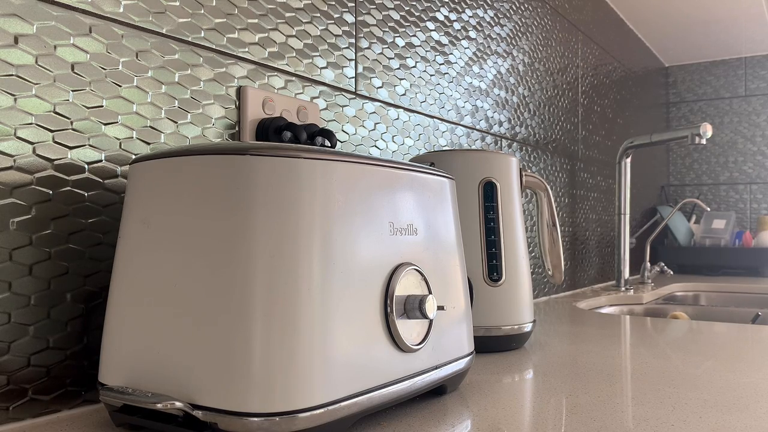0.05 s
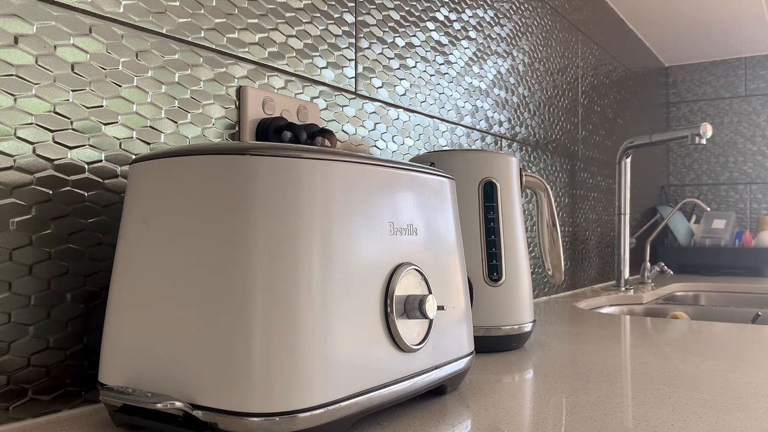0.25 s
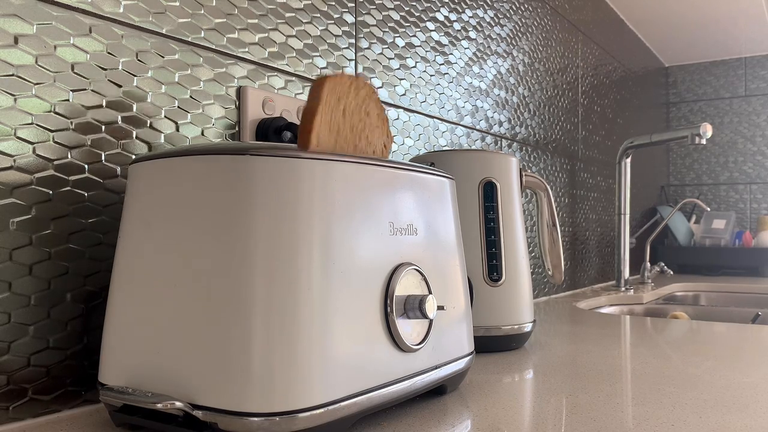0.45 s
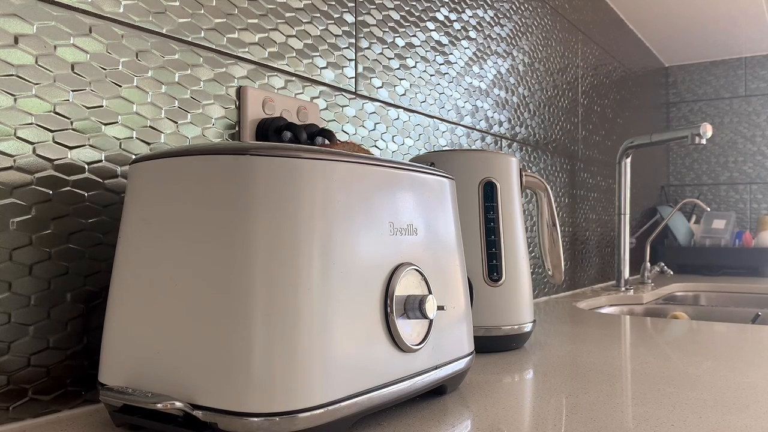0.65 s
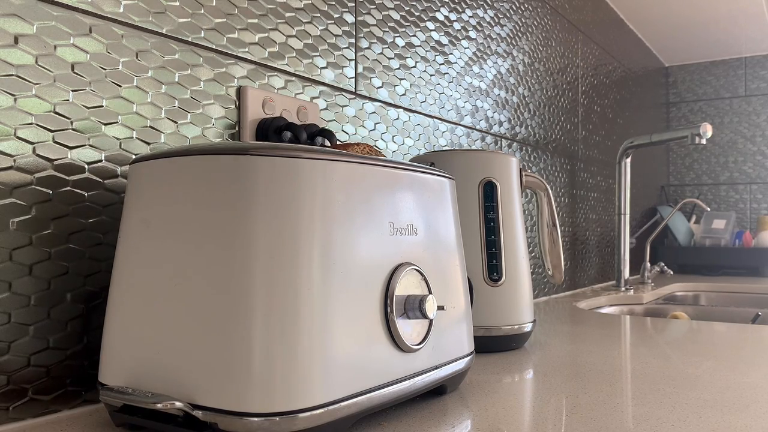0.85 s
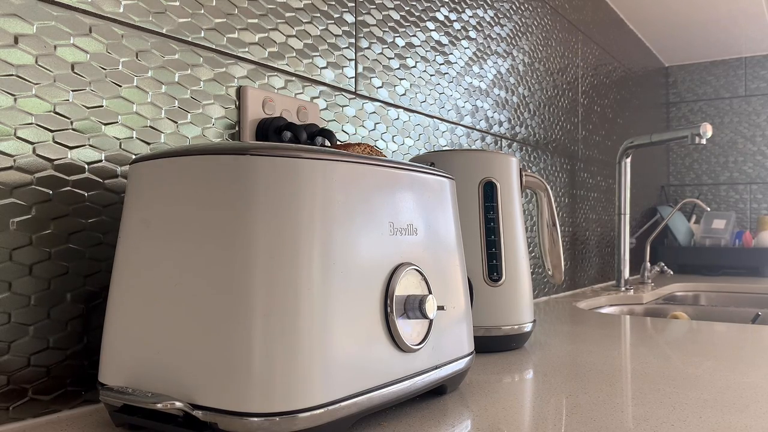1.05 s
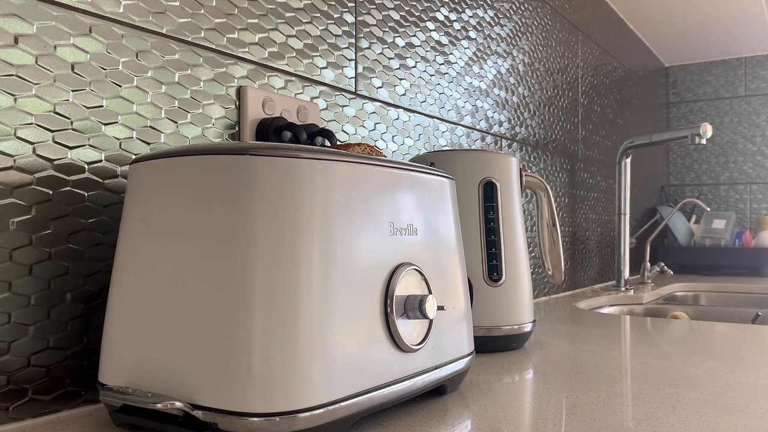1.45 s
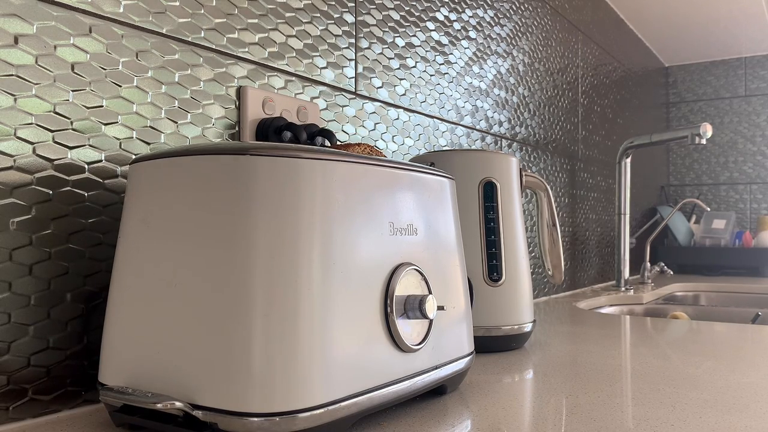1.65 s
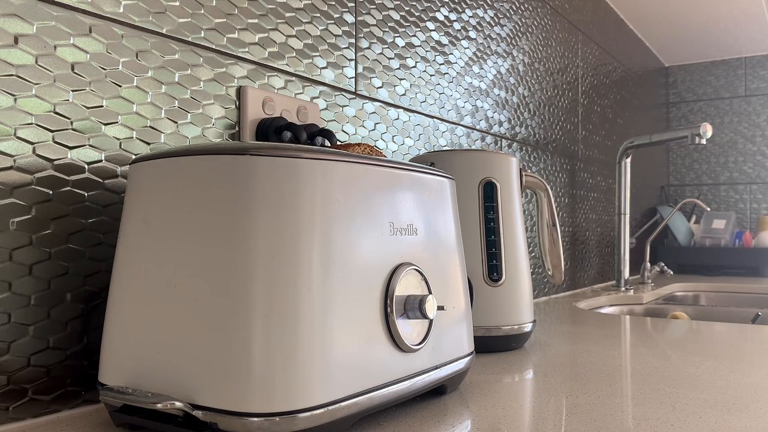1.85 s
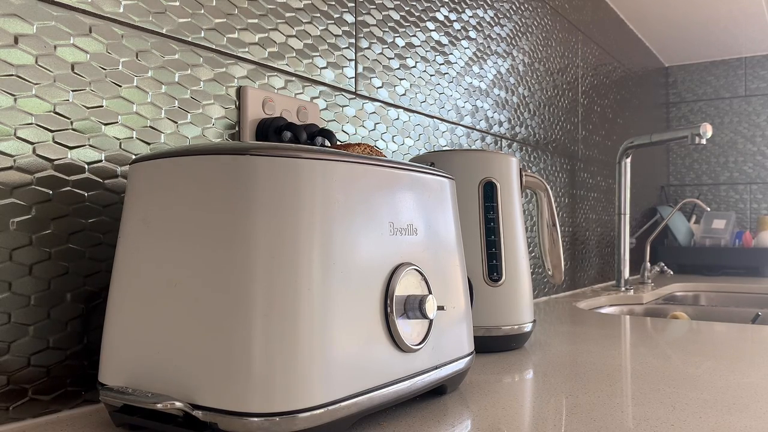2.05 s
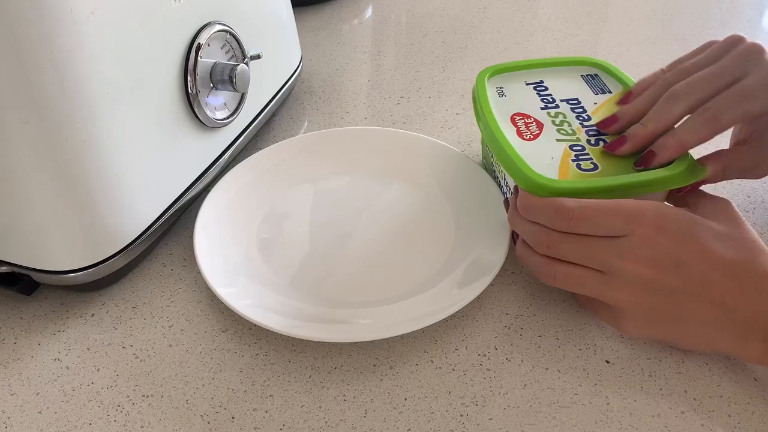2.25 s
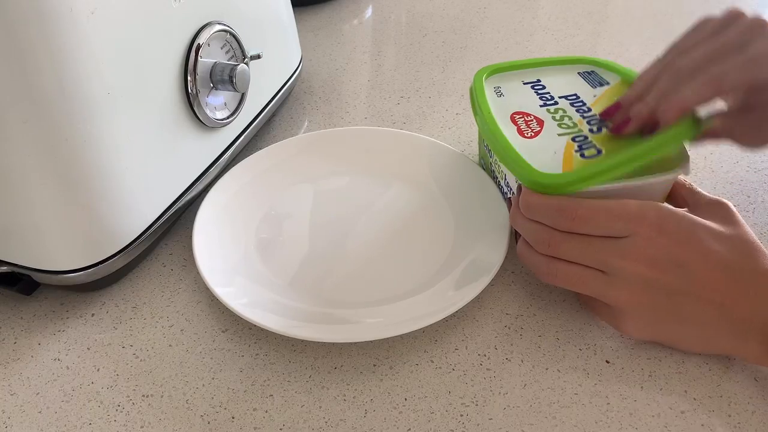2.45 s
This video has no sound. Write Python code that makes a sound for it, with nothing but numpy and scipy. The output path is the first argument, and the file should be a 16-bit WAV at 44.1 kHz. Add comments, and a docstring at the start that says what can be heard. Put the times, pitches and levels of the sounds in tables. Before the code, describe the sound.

A toaster pops up with a sharp metallic clack and rattle in a quiet kitchen.

```python
"""A quiet tiled kitchen, a phone's microphones close to a toaster on a stone counter.
The latch clicks and the magnet's faint whine stops. The sprung carriage scrapes up its guides and clacks
against its stop, the wire cage rattles, and the bread drops back and knocks as it settles.
A low hum swells and fades, and the hot metal ticks once as it cools. Near the end comes a soft click
and low bump as the room tone suddenly drops; then a plastic tub is handled on the counter."""
import sys
import numpy as np
from scipy import signal
from scipy.fft import rfft, irfft
from scipy.io import wavfile

SR = 44100
rng = np.random.default_rng(int(sys.argv[2]) if len(sys.argv) > 2 else 0)


def inscribe(sig):
    """Save sig as 16-bit PCM at rate SR to the path in sys.argv[1].

    A 1-D sig is mono; a 2-D sig holds one channel per row.
    Samples are clipped to [-1, 1] before scaling.
    """
    pcm = np.round(np.clip(np.atleast_2d(sig).T, -1, 1) * 32767)
    wavfile.write(sys.argv[1], SR, pcm.astype(np.int16))


N = 110250
T = np.arange(N) / SR
HZ = np.maximum(np.fft.rfftfreq(2 * N, 1 / SR), 1)


def amp(db):
    return 10 ** (np.asarray(db) / 20)


def curve(at, rows, column=1):
    """Straight lines through a column of a table."""
    rows = np.array(rows, float)
    return np.interp(at, rows[:, 0], rows[:, column])


def by_pitch(hz, rows):
    """Straight lines on a log-frequency axis."""
    rows = np.array(rows, float)
    return np.interp(np.log(hz), np.log(rows[:, 0]), rows[:, 1])


def unit(x):
    """Scale to the energy of one millisecond at full level."""
    return x / np.sqrt(np.sum(x ** 2, axis=-1, keepdims=True) * 1000 / SR)


def tint(x, db):
    """Minimum-phase filter with the given gain at each frequency."""
    cepstrum = irfft(np.log(amp(db)))
    cepstrum[1:N] *= 2
    cepstrum[N + 1:] = 0
    return irfft(rfft(x, 2 * N) * np.exp(rfft(cepstrum)))[..., :N]


def through(x, response):
    """Pass a sound through a response scaled to unit energy."""
    response = response / np.sqrt(np.mean(np.sum(response ** 2, axis=-1)))
    return signal.fftconvolve(np.atleast_2d(x), np.atleast_2d(response), axes=-1)[:, :N]


def fade(t60):
    """Fall by 60 dB in t60 seconds."""
    return np.exp(-np.log(1000) * np.minimum(T / max(t60, 1 / SR), 10))


def delay(x, start):
    """Start a sound at the given second."""
    gap = int(np.clip(start * SR, 0, N - 1))
    return np.concatenate([np.zeros(x.shape[:-1] + (gap,)), x[..., :N - gap]], axis=-1)


def ring(modes, scatter):
    """Decaying modes; scatter sets how far their phases differ at the two microphones."""
    phases = scatter * np.pi * rng.uniform(-1.2, 1, (len(modes), 2, 1))
    return unit(sum(amp(db) * fade(t60) * np.sin(2 * np.pi * hz * T + phase)
                    for (hz, db, t60), phase in zip(modes, phases)))


def crack(colour, t60):
    """Countless short modes: a coloured burst, different at each microphone."""
    burst = rng.standard_normal((2, N)) * fade(t60)
    return unit(tint(burst, by_pitch(HZ, colour)))


# The empty kitchen's tone. Each row: frequency in Hz, relative density in dB.
AIR_COLOUR = [(45, -24.5), (70, -10), (85, -11.5), (110, -14.5), (174, -23.5), (250, -25.5), (360, -28.5),
              (517, -28.5), (1070, -28.5), (1400, -34), (1800, -44.5), (2500, -46.5), (3200, -62),
              (4200, -75), (16000, -85)]
# Its loudness. Each row: time in seconds, level in dB.
AIR_LEVELS = [(0, -55.5), (.2, -54.5), (1.2, -52), (2.235, -51.5), (2.26, -60.5), (2.5, -60)]
# The microphones' own hiss. Each row: frequency in Hz, relative density in dB.
HISS_COLOUR = [(2500, -3.5), (4200, -2), (7000, -6), (10500, -1), (16000, -15)]
# The low hum. Each row: time in seconds, level in dB, pitch in Hz.
HUM_PATH = [(0, -46.5, 49.8), (.08, -46.5, 50.48), (.2, -56.5, 49.77), (.4, -53.5, 51.85),
            (.58, -43, 52.16), (.7, -48.5, 51.96), (.86, -57, 52.2), (1.04, -49.5, 52.6),
            (1.22, -58.5, 52.85), (1.4, -47.5, 53.34), (1.51, -42.5, 53.33), (1.66, -42.5, 53.33),
            (1.75, -50, 53.47), (1.84, -40, 51.3), (1.96, -39, 52.86), (2.15, -47.5, 50.34),
            (2.36, -55, 51.77), (2.5, -55, 51.2)]


def background():
    """Dull room tone, faint microphone hiss and a low hum that swells and fades."""
    low_cut_db = 10 * np.log10(1 + (45 / HZ) ** 4)
    air = tint(rng.standard_normal((2, N)), by_pitch(HZ, AIR_COLOUR) - low_cut_db)
    hiss = tint(rng.standard_normal((2, N)), by_pitch(HZ, HISS_COLOUR))
    hum_phase = 2 * np.pi * np.cumsum(curve(T, HUM_PATH, column=2)) / SR
    hum = np.sqrt(2) * amp(curve(T, HUM_PATH)) * np.sin(hum_phase)
    return air / air.std() * amp(curve(T, AIR_LEVELS)) + hiss / hiss.std() * amp(-83) + hum


# The magnet's whine. Each row: harmonic number, level in dB.
WHINE_HARMONICS = [(2, -82), (5, -96), (6, -98), (7, -90), (8, -89), (11, -91), (12, -90), (13, -99),
                   (17, -98)]


def magnet(pitch_hz=905):
    """The holding magnet whines faintly until the latch lets go."""
    whine = sum(amp(db) * np.sin(2 * np.pi * k * pitch_hz * T) for k, db in WHINE_HARMONICS)
    return np.sqrt(2) * whine * (T < LATCH_CLICKS[0][0])


# The latch letting go. Each row: start in seconds, level in dB.
LATCH_CLICKS = [(0.173, -27), (0.1772, -30)]
# Its modes. Each row: frequency in Hz, relative level in dB, t60 in seconds.
LATCH_RING = [(861.5, -8.5, 0.14), (1300, -11.5, 0.032), (7040, -3.5, .03), (7040, -1.5, 0.023),
              (7600, -8, 0.023), (10120, -30.5, .025)]
# Sheet metal and wires, heard close. Each row: frequency in Hz, relative density in dB.
METAL_COLOUR = [(150, -21), (350, -3.5), (800, -2), (1400, 5), (2700, -3.5), (4200, 2), (8000, 0),
                (11000, 3), (16000, -0.5)]


def latch():
    """The catch snaps open with a thin metallic click."""
    click = ring(LATCH_RING, scatter=0.81) + amp(-5.5) * crack(METAL_COLOUR, t60=0.035)
    return sum(amp(db) * delay(click, start) for start, db in LATCH_CLICKS)


def contacts(per_second=4500, spread_db=3):
    """Dense tiny impacts of uneven size; each reaches the two microphones with its own strength."""
    strength = rng.choice([-1, 1], (2, N)) * amp(spread_db * rng.standard_normal((2, N)))
    impacts = (rng.random(N) < per_second / SR) * strength
    return impacts / impacts.std()


def chatter(start, db, tilt_db, rise, t60):
    """One blow breaks up into a dying shower of contacts, its spectrum tilted above 500 Hz."""
    shower = contacts() * np.minimum(T / max(rise, 1 / SR), 1) * fade(t60)
    tilted = tint(shower, tilt_db * np.log2(np.maximum(HZ, 500)))
    return amp(db) * delay(unit(tilted), start)


# The wire cage's modes. Each row: frequency in Hz, relative level in dB, t60 in seconds.
CAGE_RING = [(852.3, -10.5, 0.17), (1250, 2.5, .24), (1333, -3, 0.1974), (1360, -6.5, 0.1),
             (3598, -10.5, .2), (3897, -6.5, 0.2), (4436, 1, .25), (4986, -2, .2), (5281, -8.5, 0.21),
             (9910, -6.5, 0.2), (10187, -3, 0.2), (10640, 0.5, .24), (10790, -1.5, .18), (11700, 0, 0.2195),
             (12525, -2.5, .16), (15310, -2, .18)]


def cage(spread_db=1):
    """The wire cage rings in a slightly different mix of its modes at every blow."""
    offsets_db = spread_db * rng.standard_normal(len(CAGE_RING))
    modes = [(hz, db + offset, t60) for (hz, db, t60), offset in zip(CAGE_RING, offsets_db)]
    return amp(-16) * ring(modes, scatter=1.0)


# Blows on the carriage and its cage. Each row: start in seconds, level in dB,
# brightness in dB per octave, rise in seconds, t60 of the chatter in seconds.
CARRIAGE_BLOWS = [(0.1743, -30.5, -2, 0.0024, 0.2), (0.1996, -23, -6.5, 0.00089, 0.034),
                  (.2045, -21.5, -8.5, 0.0008, 0.1), (0.2066, -14, -2, 0.00028, 0.083),
                  (.2245, -24.5, -7.5, 0.0015, 0.037), (0.2746, -5, 1.7, 0.0028, 0.044),
                  (0.2832, -6.5, 1.7, 0.0034, 0.22), (.299, -15, -7.5, .002, 0.084),
                  (0.3076, -9, 4.5, 0.0017, 0.22), (.332, -19.5, -0.5, 0.0006, 0.028),
                  (0.4299, -25, -9, 0.0011, 0.078), (0.53, -20.5, 3, 0.0018, 0.072),
                  (.543, -22.5, -0.5, 0.0023, 0.18), (0.579, -29.5, -0.5, 0.0016, 0.37),
                  (.765, -50, -11.5, 0.0033, 0.1), (0.824, -40, -9, 0.0029, 0.16)]
# The carriage scraping up its guides. Each row: time in seconds, level in dB.
SCRAPE_LEVELS = [(.205, -62), (.236, -38), (.246, -30.5), (.262, -30), (.275, -18), (.285, -60)]


def carriage():
    """Scraping and blows ring the wire cage and, each at its own spot, the sheet metal."""
    sliding = (T > SCRAPE_LEVELS[0][0]) & (T < SCRAPE_LEVELS[-1][0])
    scrape = contacts() * amp(curve(T, SCRAPE_LEVELS)) * sliding
    forces = [scrape] + [chatter(*blow) for blow in CARRIAGE_BLOWS]
    return sum(through(force, crack(METAL_COLOUR, t60=0.044) + cage()) for force in forces)


def struck(modes, tilt_db):
    """The spot of a knock favours the high or the low modes."""
    return [(hz, db + tilt_db * np.log2(hz / modes[0][0]), t60) for hz, db, t60 in modes]


# Knocks on the case. Each row: start in seconds, level in dB, brightness in dB per octave.
CASE_KNOCKS = [(.184, -30, 11.5), (0.2023, -17, -11), (0.2231, -21, -4), (0.2318, -12.5, 3),
               (0.2825, -12.5, 8.5), (.2905, -17.5, 0), (.326, -23.5, -4), (.351, -22, -3), (.435, -31, 30),
               (.540, -23.5, 7), (0.576, -28.5, -3), (.612, -32, -8), (.642, -34, -2), (.682, -31.5, -10),
               (.698, -38.5, -4), (.823, -34.5, 2), (0.839, -36.5, -7), (.854, -43.5, -5)]
# The case's modes. Each row: frequency in Hz, relative level in dB, t60 in seconds.
CASE_RING = [(256.5, -14, 0.29), (329, -1, 0.11), (383, -0.5, .075), (404.6, 0.5, 0.25),
             (435.6, -3.5, 0.12), (474.5, -4, .11), (555.3, -11, 0.22)]
# The noisy part of a knock. Each row: frequency in Hz, relative density in dB.
CASE_COLOUR = [(120, -33), (250, -8), (380, 6.5), (520, -7.5), (800, -5), (1500, -19), (4000, -47)]


def case(rise_s=0.018):
    """Carriage and bread knock on the hollow case, each time at another spot."""
    out = 0
    for start, db, tilt_db in CASE_KNOCKS:
        tone = ring(struck(CASE_RING, tilt_db), scatter=0.48)
        noise = amp(-3.5) * crack(CASE_COLOUR, t60=0.12)
        knock = unit((tone + noise) * (1 - fade(rise_s)))
        out = out + amp(db) * delay(knock, start)
    return out


# The toaster's feet on the stone. Each row: start in seconds, level in dB.
FOOT_THUMPS = [(.2105, -27.5), (0.233, -22.5), (0.29, -26), (0.311, -25), (0.352, -23.5), (0.398, -34.5),
               (0.411, -33), (0.4549, -23.5), (0.48, -30), (0.544, -33.5), (.555, -31), (0.567, -33.5),
               (0.608, -29), (0.632, -34), (0.669, -32)]
# Its modes on the counter. Each row: frequency in Hz, relative level in dB, t60 in seconds.
FOOT_RING = [(83, 8, 0.078), (116.4, 6, 0.058), (165, -14.5, .09)]


def feet(rise_s=0.037):
    """The toaster rocks and thumps softly on the counter."""
    low_cut = signal.butter(2, 40, "high", fs=SR, output="sos")
    rocking = -ring(FOOT_RING, scatter=0) * (1 - fade(rise_s))
    thump = unit(signal.sosfilt(low_cut, rocking))
    return sum(amp(db) * delay(thump, start) for start, db in FOOT_THUMPS)


# The spring's modes. Each row: frequency in Hz, relative level in dB, t60 in seconds.
SPRING_RING = [(3030, 0, .95), (3715, -2, 1.15), (3745, -4, 1.15)]


def spring():
    """The carriage's hardest blow leaves a long, faint ring in the spring."""
    hardest = max(CARRIAGE_BLOWS, key=lambda blow: blow[1])
    return amp(-30.5) * delay(ring(SPRING_RING, scatter=0.41), start=hardest[0])


# The hot metal's one mode. The row: frequency in Hz, relative level in dB, t60 in seconds.
COOLING_RING = [(5000, 0, .07)]


def cooling():
    """The hot metal gives one tiny tick as it cools."""
    return amp(-70) * delay(ring(COOLING_RING, scatter=0.26), start=1.431)


# First a soft click and low bump as the room tone suddenly drops; from the second row on, the tub.
# Each row: start in seconds; the crackle's level in dB, brightness in dB per octave, rise and t60
# in seconds; the knock's level in dB and brightness in dB per octave; the bump's level in dB.
CLICK_THEN_TUB = [(2.2427, -56.5, -1, 0.00074, 0.05, -60.5, -2.5, -39),
                  (2.35, -51, -4.5, .001, 0.06, -51.5, 8.5, -49),
                  (2.367, -39, -1.5, 0.0012, 0.084, -43, 11, -49.5),
                  (2.377, -48, -1.5, 0.0016, 0.13, -60, 6, -35.5),
                  (2.393, -59, -4, .002, .03, -62, 0, -30.5),
                  (2.4072, -36.5, -2, 0.0019, 0.014, -50, 3, -42),
                  (2.4116, -22.5, 1.5, 0.001, 0.055, -29.5, 8, -43),
                  (2.423, -26.5, 4.5, 0.0018, 0.086, -35, 5.5, -29.5),
                  (2.439, -35, 7, 0.0015, 0.12, -42, -7, -27), (2.453, -48, 5, .002, .04, -55, -2, -30.5),
                  (2.478, -32, 2.5, 0.0056, 0.067, -48, 4, -48),
                  (2.4883, -30, 1, .002, 0.092, -30, -16, -36.5)]
# Crackling plastic. Each row: frequency in Hz, relative density in dB.
PLASTIC_COLOUR = [(120, -1), (350, -1), (480, -2.5), (620, 5.5), (900, 4.5), (1300, -1), (2300, -5.5),
                  (3000, -5.5), (3700, -4.5), (5000, -8), (6000, -15.5), (10500, -10), (13000, -16.5),
                  (16000, -20)]
# The hollow tub's modes. Each row: frequency in Hz, relative level in dB, t60 in seconds.
TUB_RING = [(335, -0.5, 0.13), (400, -3.5, 0.11), (586, 2, 0.1), (630, 3.5, 0.088), (904, -12, 0.091),
            (1152, -11.5, .09), (1320, -6, .06), (2825, -17, 0.046), (3526, -28, 0.077)]
# The low bump's modes. Each row: frequency in Hz, relative level in dB, t60 in seconds.
BUMP_RING = [(87, 12, 0.08), (134, -9, 0.057)]


def click_and_tub():
    """A soft click and bump; then stiff plastic crackles, knocks hollow and bumps on the counter."""
    bump = ring(BUMP_RING, scatter=0)
    out = 0
    for start, db, tilt_db, rise, t60, knock_db, knock_tilt_db, bump_db in CLICK_THEN_TUB:
        force = chatter(start, db, tilt_db, rise, t60)
        crackle = through(force, crack(PLASTIC_COLOUR, t60=0.024))
        hollow = ring(struck(TUB_RING, knock_tilt_db), scatter=0.49)
        out = out + crackle + delay(amp(knock_db) * hollow + amp(bump_db) * bump, start)
    return out


# The tiled room's decay. Each row: frequency in Hz, t60 in seconds.
KITCHEN_DECAY = [(100, .7), (400, .75), (1500, .9), (4000, .68), (8000, .46), (16000, .38)]
# Reflections at this close range. Each row: frequency in Hz, level in dB against the direct sound.
KITCHEN_LEVELS = [(100, -2.5), (400, -12), (1500, -2.5), (4000, -7.5), (8000, -8.5), (16000, -28)]


def kitchen(direct, build_s=0.01):
    """Reflections from tiles and counter follow the direct sound; the treble dies first."""
    noise = rfft(rng.standard_normal((2, N)), 2 * N)
    octaves = np.arange(7, 15)  # bands centred on 128 Hz to 16 kHz
    position = np.clip(np.log2(HZ), octaves[0], octaves[-1])
    tail = 0
    for octave in octaves:
        centre_hz = 2. ** octave
        band = irfft(noise * np.maximum(1 - abs(position - octave), 0))[:, :N]
        envelope = fade(by_pitch(centre_hz, KITCHEN_DECAY)) * (1 - np.exp(-T / build_s))
        envelope /= np.sqrt(np.sum(envelope ** 2))
        tail = tail + band * envelope * amp(by_pitch(centre_hz, KITCHEN_LEVELS))
    return direct + signal.fftconvolve(direct, tail, axes=-1)[:, :N]


def scene():
    """The close sounds ring out into the kitchen, over its background and the magnet's whine."""
    direct = latch() + carriage() + case() + feet() + spring() + cooling() + click_and_tub()
    return background() + magnet() + kitchen(direct)


# The balance of the phone's microphones. Each row: frequency in Hz, left minus right in dB.
MIC_BALANCE = [(50, -0.2), (150, 2), (380, 1), (700, 2), (1400, 2), (3500, -1.05), (16000, 0)]


def record(dry, alike_below_hz=300, shared_above_hz=6800, in_phase_hz=6150, lag_s=0.000208):
    """Both microphones hear the same bass; the treble is one signal, later on the left; the top is cut."""
    left, right = rfft(dry, 2 * N)
    mid = (left + right) / 2
    side = (left - right) / 2 * HZ / np.hypot(HZ, alike_below_hz)
    left, right = mid + side, mid - side
    shared = 1 / (1 + (shared_above_hz / np.maximum(HZ, 100)) ** 20)
    lagged_right = right * np.exp(-2j * np.pi * (HZ - in_phase_hz) * lag_s)
    left = np.sqrt(1 - shared) * left + np.sqrt(shared) * lagged_right
    lean = amp(by_pitch(HZ, MIC_BALANCE) / 2)
    stereo = irfft(np.array([left * lean, right / lean]))[:, :N]
    high_cut = signal.ellip(10, 0.2, 80, 15750, fs=SR, output="sos")
    return signal.sosfilt(high_cut, stereo)


dry = scene()
out = record(dry)
inscribe(out)
```